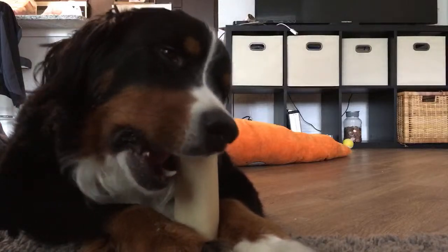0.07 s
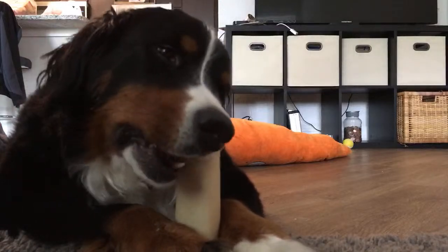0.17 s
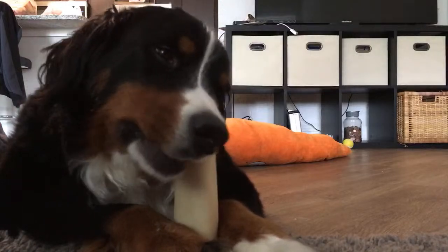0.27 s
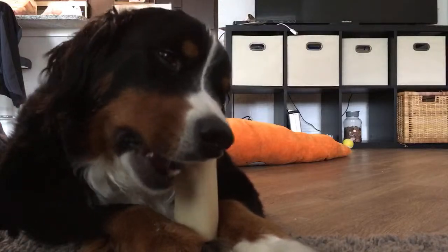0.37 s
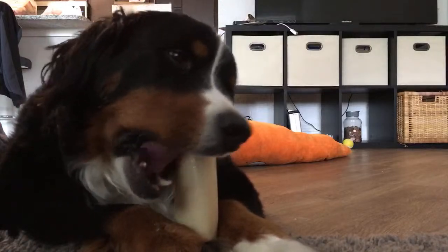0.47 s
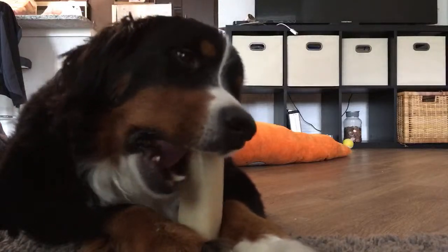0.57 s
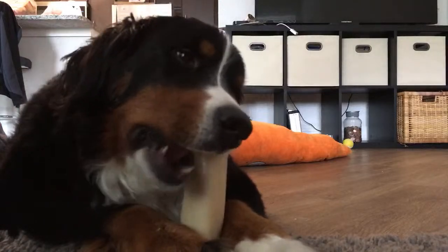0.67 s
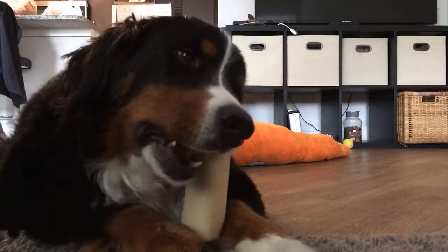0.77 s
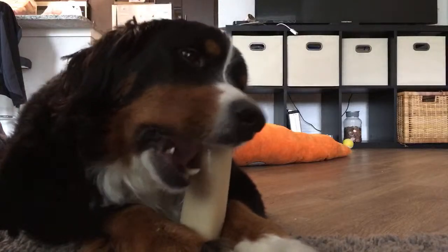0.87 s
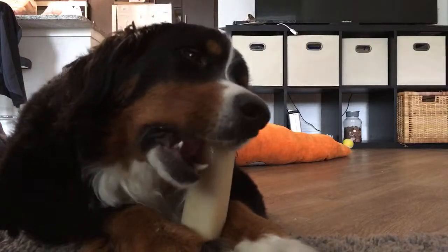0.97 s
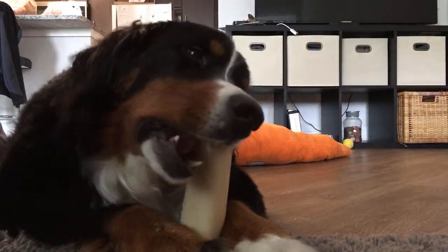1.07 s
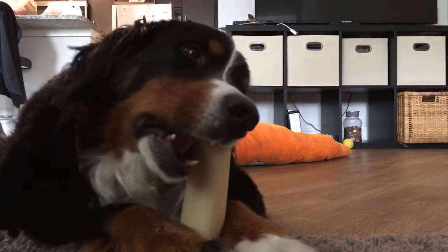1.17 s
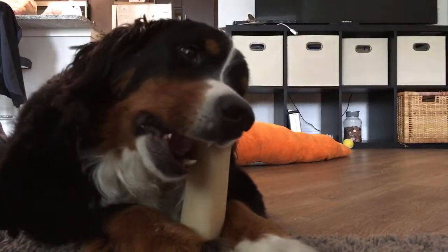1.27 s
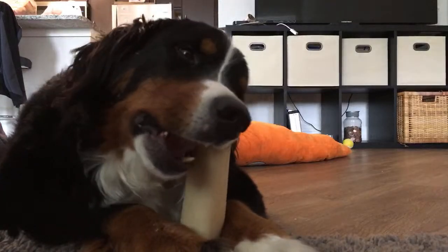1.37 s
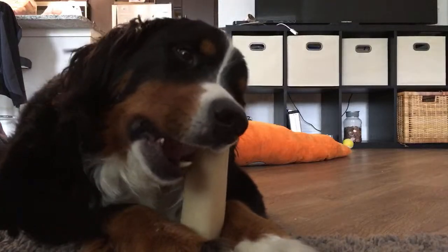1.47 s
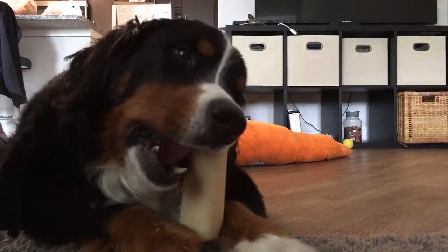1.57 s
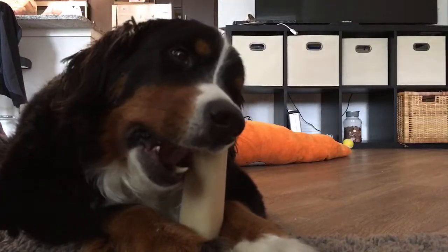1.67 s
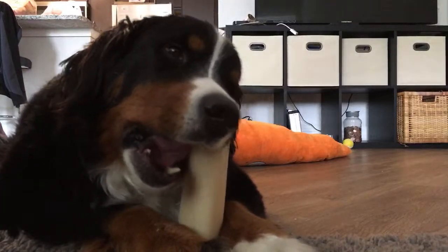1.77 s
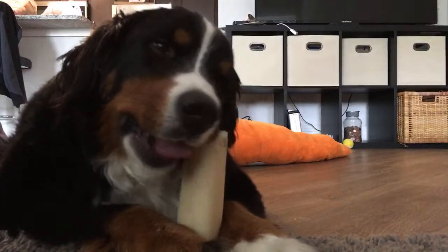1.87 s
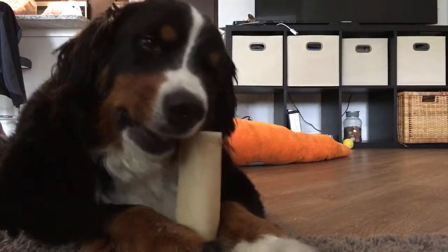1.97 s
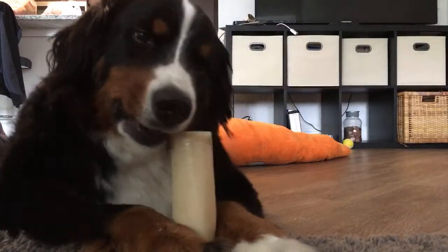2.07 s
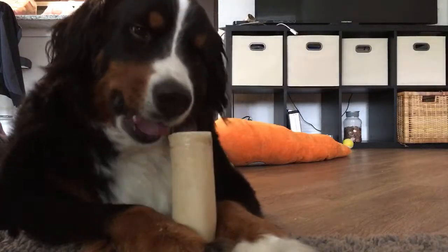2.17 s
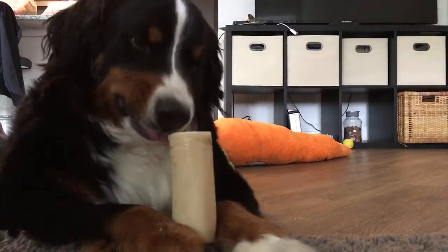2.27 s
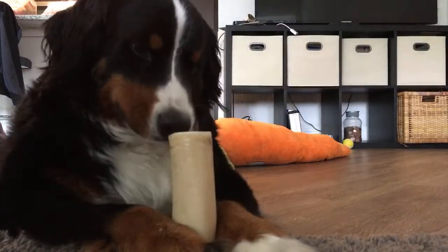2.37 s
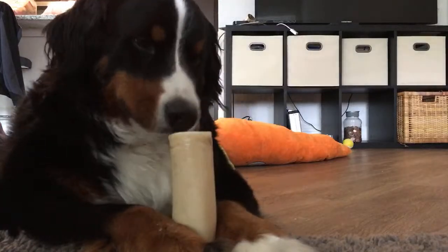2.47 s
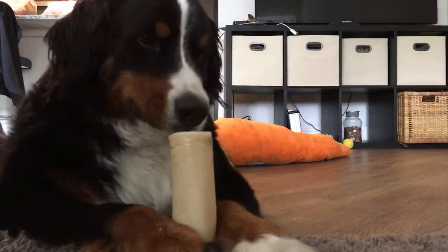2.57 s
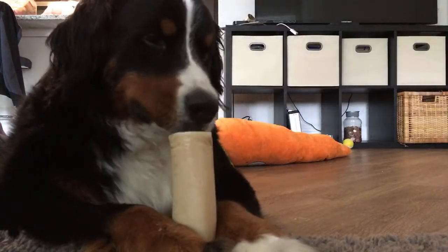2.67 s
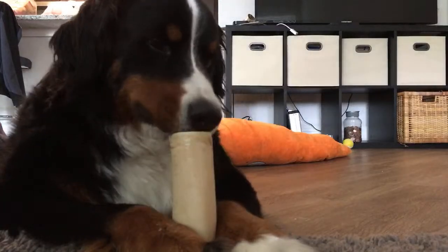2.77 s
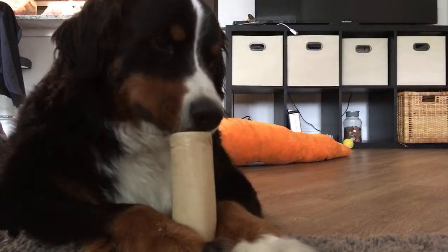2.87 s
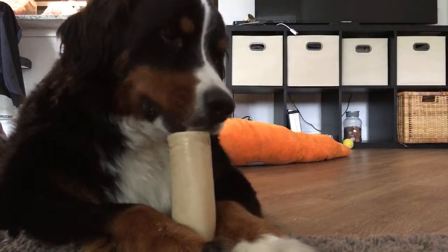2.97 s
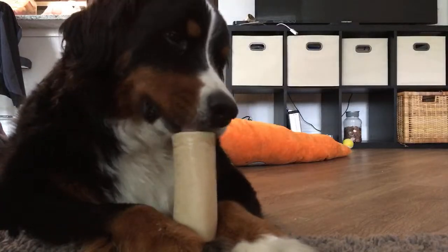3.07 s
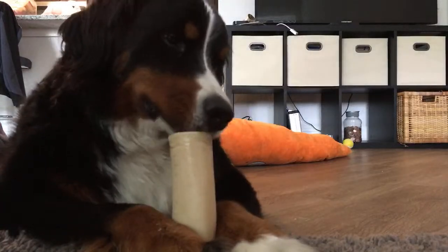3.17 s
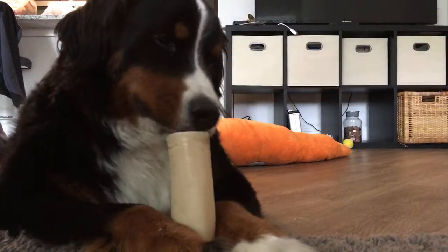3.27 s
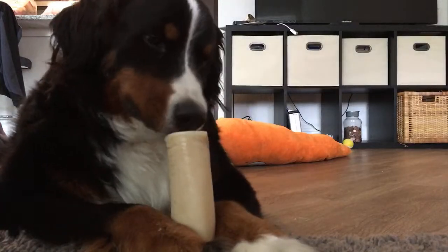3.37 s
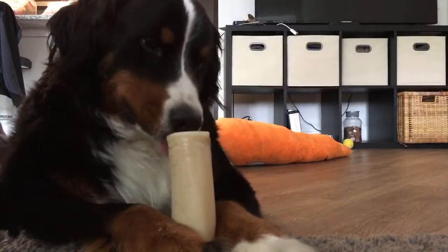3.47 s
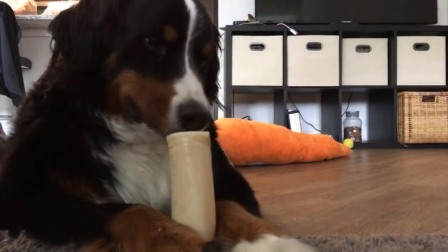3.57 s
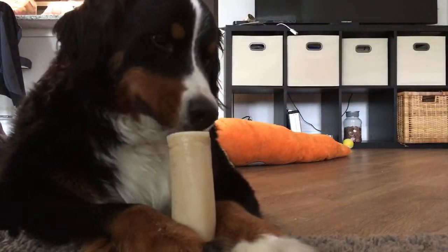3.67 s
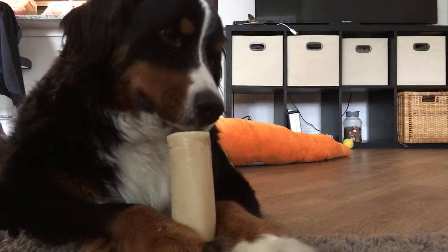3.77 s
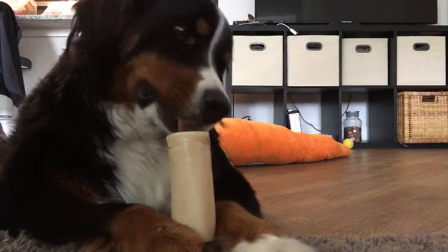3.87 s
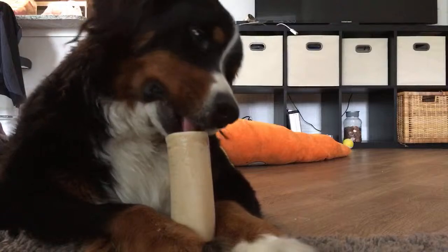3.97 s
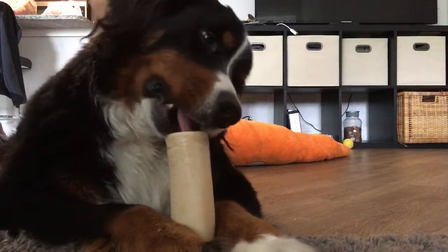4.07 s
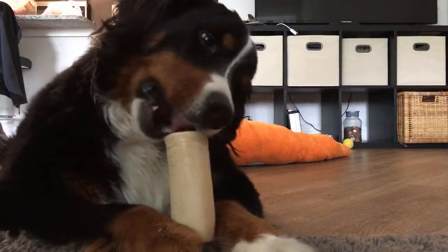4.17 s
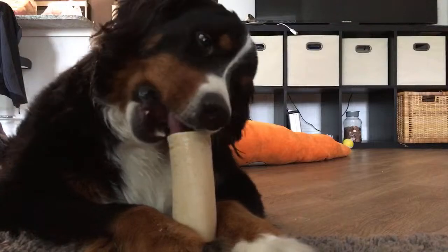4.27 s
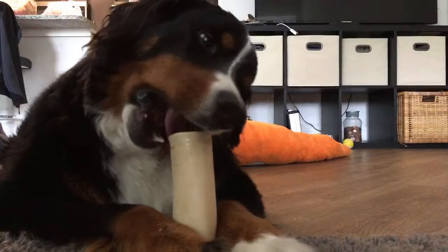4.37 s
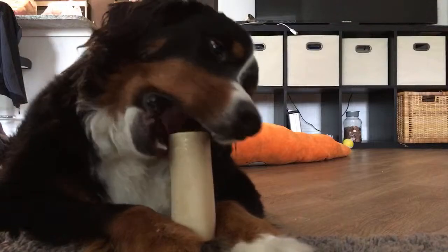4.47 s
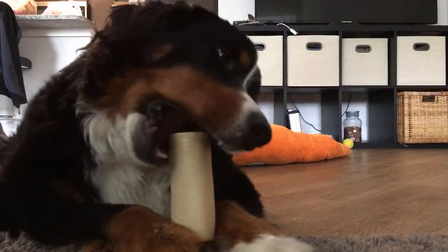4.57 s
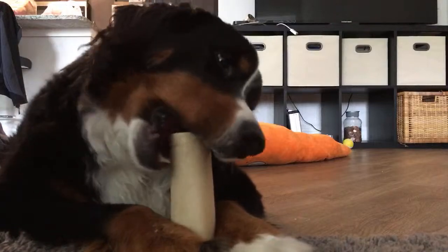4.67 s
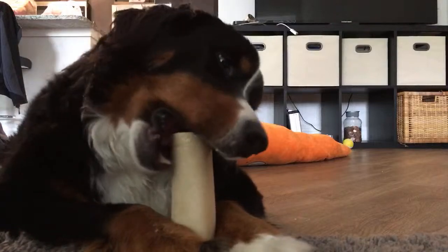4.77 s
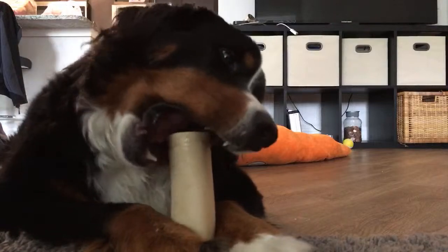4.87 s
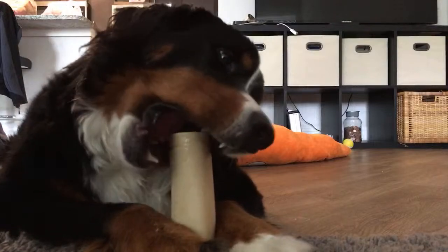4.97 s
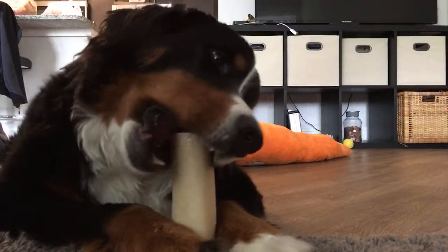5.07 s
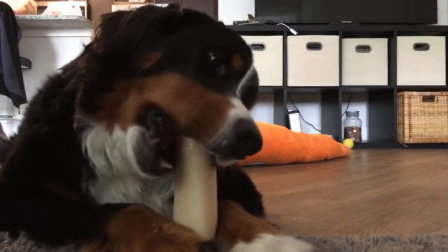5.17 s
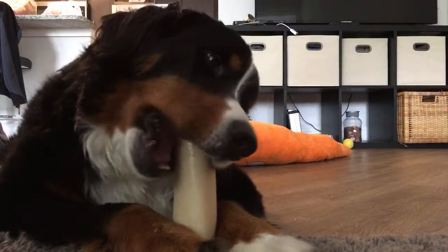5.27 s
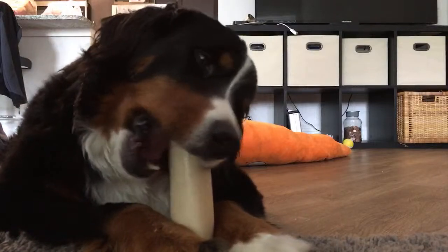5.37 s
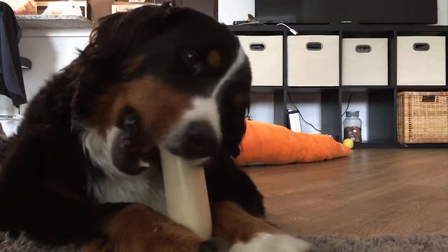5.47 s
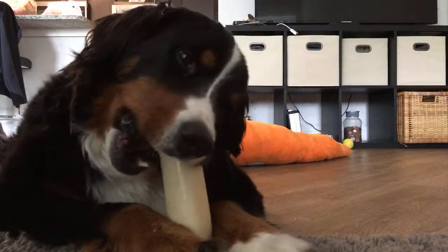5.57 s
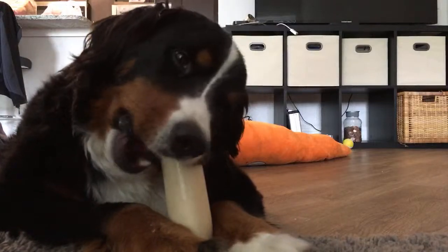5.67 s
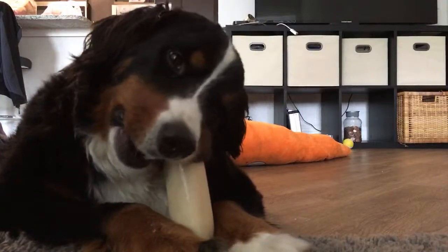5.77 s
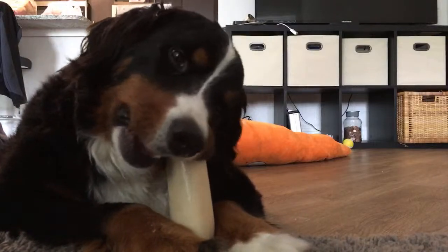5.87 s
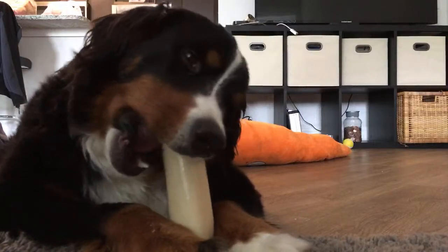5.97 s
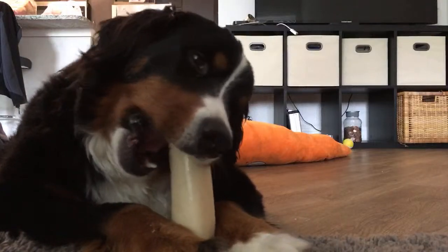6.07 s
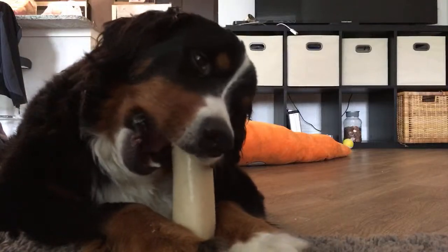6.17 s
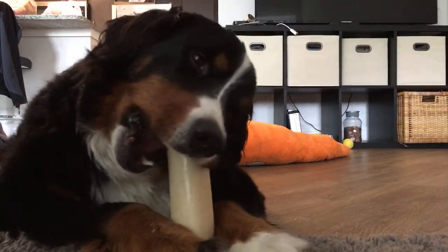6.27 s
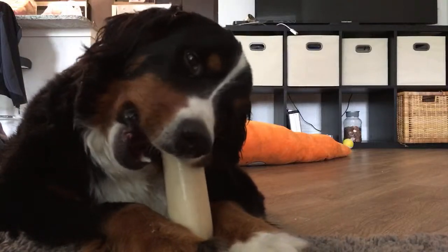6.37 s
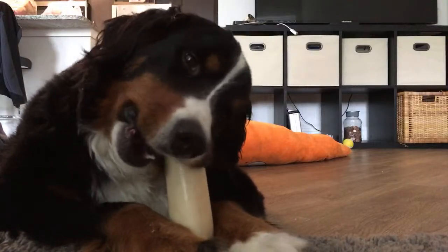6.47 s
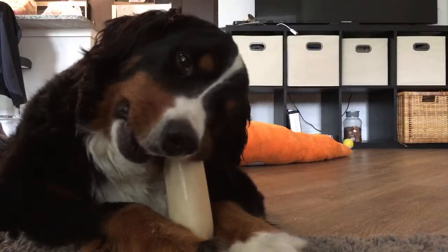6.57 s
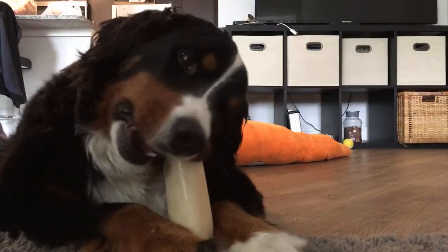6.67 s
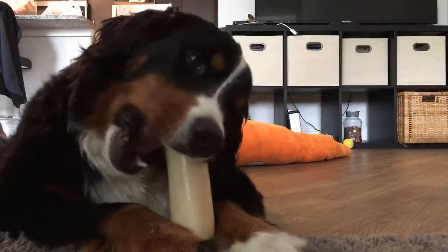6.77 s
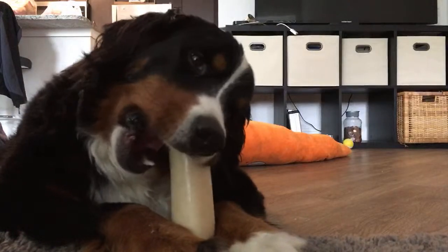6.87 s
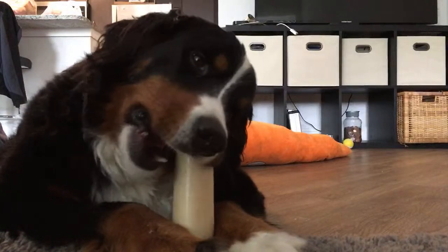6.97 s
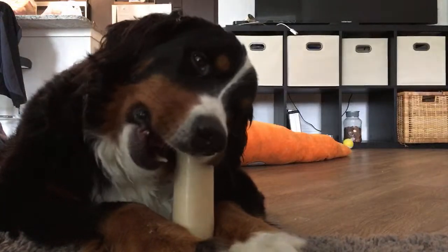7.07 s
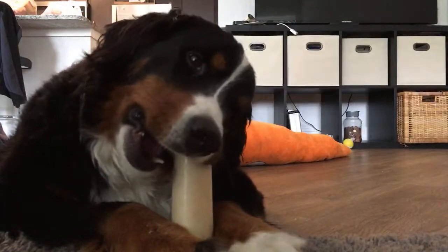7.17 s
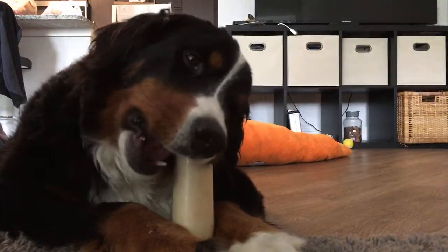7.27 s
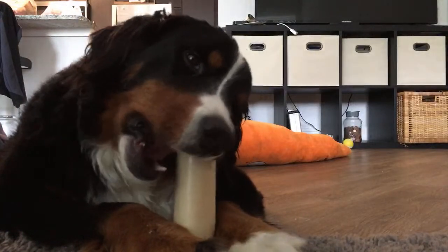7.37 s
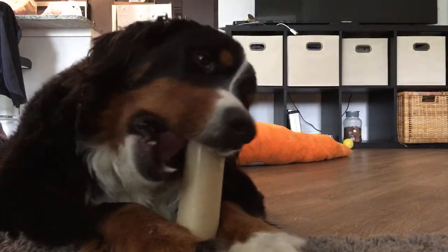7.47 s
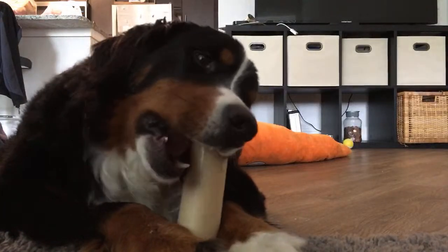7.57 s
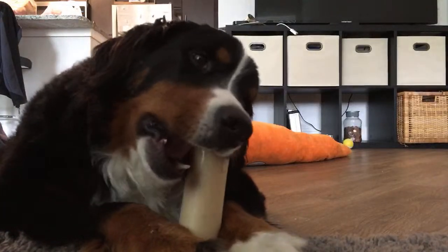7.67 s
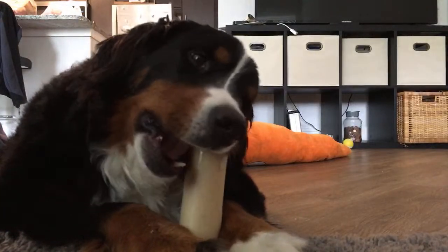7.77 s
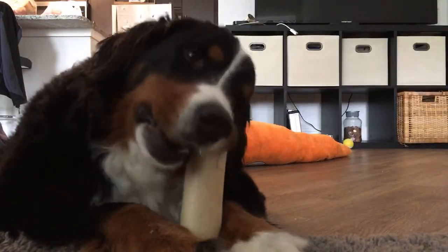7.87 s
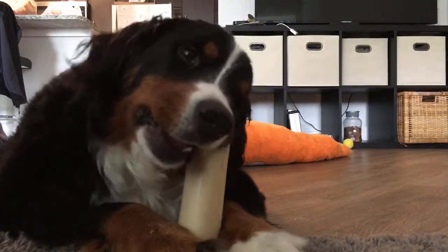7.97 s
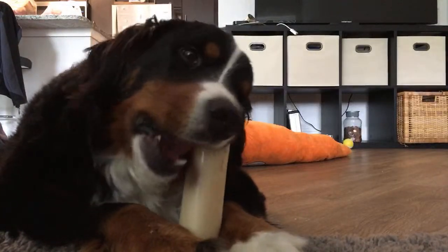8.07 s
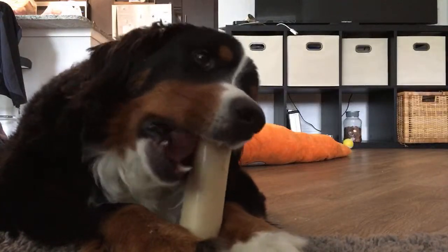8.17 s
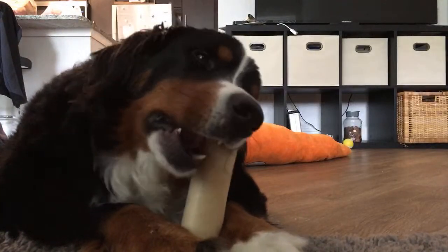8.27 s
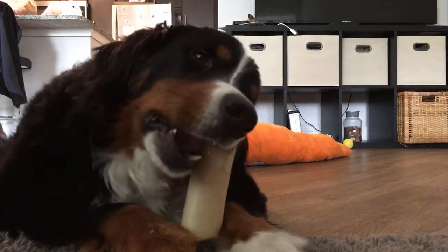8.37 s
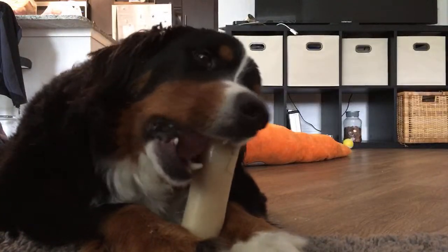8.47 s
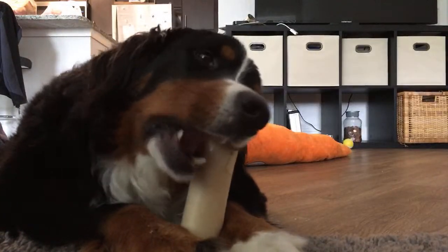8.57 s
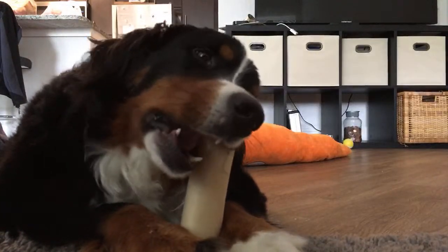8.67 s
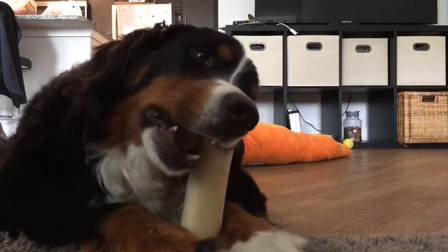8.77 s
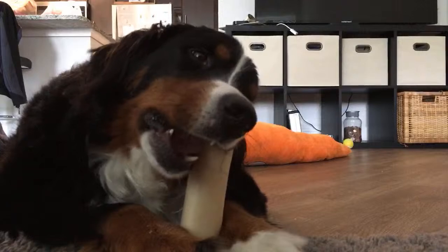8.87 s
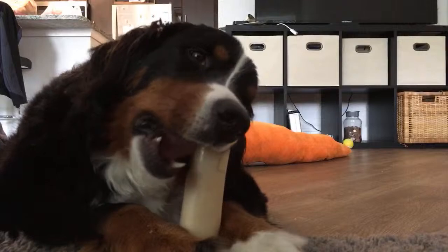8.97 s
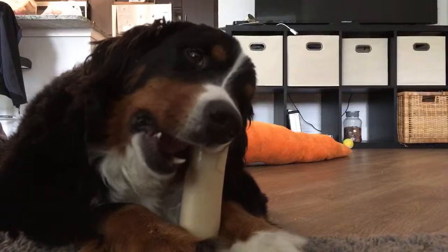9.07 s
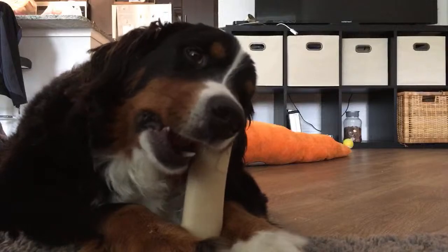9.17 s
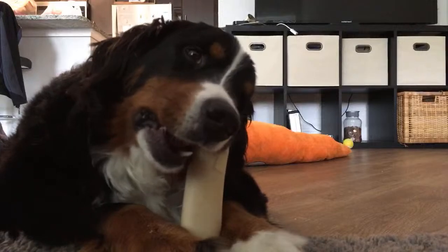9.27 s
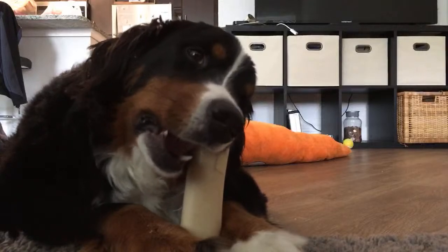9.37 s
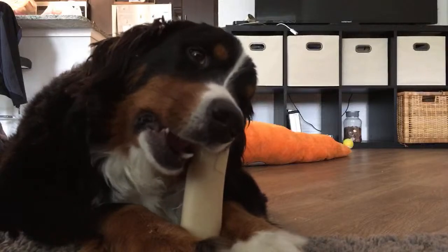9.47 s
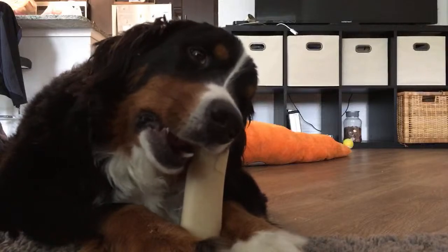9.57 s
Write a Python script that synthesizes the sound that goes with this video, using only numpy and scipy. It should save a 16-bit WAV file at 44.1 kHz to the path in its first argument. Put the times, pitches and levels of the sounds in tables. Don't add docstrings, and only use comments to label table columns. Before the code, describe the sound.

Close on a large dog chewing a hard bone on the floor of a living room. Irregular small ticks, chips and muffled tooth presses, then a violent crack near one and a half seconds that rings around the room. Wet tongue smacks follow in a quieter stretch, gnawing resumes, and a second thudding crack comes near eight seconds. A low hum and thin, fast-ticking phone hiss run underneath.

```python
import sys
import numpy as np
from scipy import signal
from scipy.fft import rfft, irfft
from scipy.io import wavfile

SR = 44100
rng = np.random.default_rng(int(sys.argv[2]) if len(sys.argv) > 2 else 0)


def int16_out(signal):
    q = np.round(np.clip(np.atleast_2d(signal).T, -1, 1) * 32767)
    wavfile.write(sys.argv[1], SR, q.astype(np.int16))


def makeup_ratio(level_db):
    decades = np.asarray(level_db, float) / 20
    return 10 ** decades


N = 424683

# pitch_hz, level_db (rms)
HUM_LINES = [(120.1, -54.5), (166.0, -42.5), (797.0, -77.5)]
# freq_hz, density_db
RUMBLE_SPECTRUM = [(15, -45), (25, -34), (38, -77.5), (64, -18), (145, -5), (167, -3.5), (189, -6),
                   (216, -5.5), (479, -30), (600, -34), (780, -76.5), (1320, -120)]
RUMBLE_SPAN_DB = 10
# start_s, rumble_db
LEANING = [
    (0.0, -55),
    (0.7, -56),
    (1.37, -54.5),
    (1.85, -57.5),
    (5.0, -58),
    (7.1, -56),
    (8.77, -55),
    (9.63, -57),
]
# freq_hz, density_db
AIR_SPECTRUM = [(240, -11), (400, -5), (526, -13.5), (783, -11.5), (943, -15.5), (1120, -14), (6080, -32),
                (7800, -35), (10100, -70.5), (17200, -120)]
AIR_DB = -63
# freq_hz, density_db
HISS_SPECTRUM = [(4470, -20.5), (7600, -38), (7950, -15.5), (8260, 0.5), (9140, 1), (9940, -0.5),
                 (11200, 3.5), (13500, -6.5), (15500, -2)]
HISS_DB = -66.5
# start_s, lag_ms, jitter_ms, stragglers_db
TICK_LAG = [(0, 29, 2, -5), (.43, 22, 3, -5), (.65, 11, 4, -4), (1.12, 5, 5, -4), (1.55, 24.5, 4, -6),
            (3.33, 21.5, 1, -6), (3.75, 10, 1, -5), (4.1, 14, 3, -3), (5.0, 12.5, 4, -3), (6.72, 5, 5, -1),
            (9.02, .5, 1, -2), (9.25, -3.8, 2, -2)]
TICKS_PER_S = 30
# level_db, centre_hz, width_octaves, t60_s
EARLIER_CRACK = (-54.5, 1348, 3, 0.7)

# start_s, level_db, bone_hz, jaw_load_db
CHIPS = [(.232, -44.5, 3500, -8), (.4205, -48, 3560, -12), (.4367, -39, 3850, -7), (.6629, -57, 3940, -2.5),
         (.822, -62.5, 4500, 2), (1.152, -51, 2740, -21), (1.3187, -58, 2920, -4.5),
         (3.0674, -64, 5115, -8.5), (4.673, -54.5, 2930, -15.5), (5.024, -63, 2895, -3),
         (5.8054, -50, 4730, -9), (6.102, -48, 3600, -10.5), (6.575, -52, 3780, -11),
         (6.8772, -66, 2713, 8), (7.044, -49, 4020, -13.5), (8.0172, -42, 2270, 0),
         (9.5306, -57, 3470, -10)]
# start_s, level_db, snap_hz, jaw_load_db
SMACKS = [(.4265, -57, 10300, -17), (1.6993, -46, 10980, -20), (3.1058, -47.5, 8900, -28),
          (3.1557, -46.5, 9300, -31.5), (3.175, -50, 9300, -30), (3.1926, -45.5, 12100, -33),
          (4.365, -50.5, 9500, -13), (5.4644, -58, 10220, -15), (5.5154, -46.5, 11990, -21),
          (5.8134, -35, 8550, -25), (8.1519, -52.5, 11150, -8), (8.245, -58, 8500, -24),
          (3.69, -55, 9400, -26)]
# start_s, level_db, bone_hz, jaw_load_db
TAPS = [(.4484, -44.5, 4200, -8), (.4638, -50, 3620, -6), (.8594, -55.5, 4700, -2), (1.1328, -52, 3020, -7),
        (1.2336, -70.5, 2810, 17.5), (1.3593, -60, 2970, -2), (1.3694, -52, 4360, -3.5),
        (2.33, -54, 3360, -10), (3.4717, -51.5, 3730, -17.5), (4.7077, -51.5, 4680, -21),
        (4.778, -68, 2790, 6), (4.8998, -53.5, 3600, -12), (5.846, -57, 4120, -2), (6.9105, -70, 2770, 8.5),
        (7.6789, -39.5, 3650, -12), (7.8068, -49, 5150, -7), (7.9992, -32.5, 3764, -15),
        (8.266, -46, 2620, -6.5), (8.3394, -50.5, 3700, -8.5), (8.8435, -33.5, 3600, -18),
        (9.2584, -47, 3400, -7.5)]
# start_s, level_db, bone_hz, jaw_load_db
GRINDS = [(2.845, -61.5, 4390, -9.5), (3.68, -61, 5650, -13), (3.6982, -50, 5750, -20.5),
          (4.8145, -48, 3100, -13.5), (5.1165, -55.5, 2200, -1.5), (5.2362, -56.5, 4530, 0),
          (5.6082, -53, 3750, -8), (6.129, -50, 3170, 2.5), (6.8942, -50, 3220, 4.5),
          (6.9642, -47, 4070, -3.5), (7.1056, -46, 3600, -10), (8.3135, -61, 5010, -13),
          (5.0383, -52, 3320, -20)]
# start_s, level_db, bone_hz, jaw_load_db
PRESSES = [(2.8545, -49, 3220, -26), (3.0405, -51.5, 3127, -21), (3.614, -58, 3500, -15.5),
           (5.128, -63, 2100, 3), (5.8215, -47, 3830, -13), (6.082, -56, 3800, -8), (6.148, -65.5, 2500, 3),
           (6.1958, -54, 3940, -14), (7.6218, -48.5, 3580, 1), (8.525, -56.5, 3500, -0.5),
           (8.6066, -56.5, 1900, 5), (8.787, -58, 3450, -9.5), (8.837, -50.5, 3520, -5),
           (9.124, -66, 2490, 6), (9.289, -64.5, 1100, 5), (9.511, -58.5, 1600, 2.5)]
# bone_db, edge_db, snap_db
TAP_MIX = (-1, -18, -17)
GRIND_MIX = (0.1, -2, -13)
CHIP_MIX = (-1.8, -14, 0.1)
SMACK_MIX = (-16, -30, 0.1)
PRESS_MIX = (0.1, -40, -40)
SNAP_HZ, SMACK_BONE_HZ = 10100, 3470

# start_s, level_db, mode_hz, t60_s
THUDS = [(1.4853, -18, 209, 0.027), (1.503, -33.5, 89.2, 0.2), (7.9478, -9.5, 205, 0.03),
         (7.953, -23.5, 103, 0.1), (7.965, -23.5, 190, 0.17), (7.989, -31.5, 270.6, 0.21),
         (7.952, -34.5, 337, 0.12), (7.959, -26, 142, .12), (8.843, -27, 227, 0.022),
         (5.82, -34.5, 332, 0.061), (6.13, -34.5, 315, 0.0089), (5.235, -39.5, 393, 0.028),
         (5.609, -37.5, 348, 0.02), (6.894, -39.5, 372, 0.029), (8.272, -35.5, 296, 0.029),
         (0.269, -45, 86, 0.054), (1.158, -44, 90.5, 0.11), (1.261, -46, 80.75, 0.091),
         (5.871, -54, 85, 0.15), (6.929, -51, 85, 0.034), (9.29, -47.5, 80.5, .1)]
# start_s, length_s, level_db, centre_hz, width_octaves
SLIDES = [(0.43, 0.04, -58, 3000, 1.9), (0.819, 0.053, -69, 4000, 1), (1.462, 0.053, -56.5, 5770, 1.9),
          (6.852, .02, -68.5, 3500, 0.53), (7.795, 0.018, -66.5, 3510, 1.2),
          (7.937, 0.0086, -48, 4700, 1.6), (2.02, 0.032, -60.5, 9130, 0.45), (3.191, 0.11, -61, 9790, 0.63),
          (3.167, 0.096, -71, 3780, 1.6), (3.677, 0.043, -68.5, 5400, 0.56),
          (5.52, 0.064, -70, 13000, 0.47), (5.804, 0.042, -59, 5960, 2.2), (6.082, 0.09, -69, 3990, 1.7),
          (6.897, 0.032, -71.5, 1210, 2.5), (7.609, 0.058, -77.5, 1510, 1.04),
          (8.019, 0.03, -66, 2520, 2.7), (8.662, 0.05, -67.5, 5500, 1.5), (8.836, 0.022, -47, 980, 0.63),
          (9.093, 0.094, -66, 9430, 0.42), (9.106, .1, -67, 14000, 0.27), (9.1, 0.036, -70.5, 4490, 1.5),
          (9.246, 0.039, -60.5, 6020, 2.5), (9.512, 0.12, -66, 9300, 0.37), (9.515, .1, -68, 14000, .25)]
LONG_LICK_S = .095

# start_s, level_db, crumble_s, tilt_db_per_octave, snap_over_ring_db
CRACKS = [(1.481, -27, 0.0037, -18, -2.5), (1.4828, -19.5, .003, -5, -9.5), (1.4836, 5.5, 0.0014, 6, -13.5),
          (1.4853, -8.5, 0.0029, 1, -7.5), (1.487, -17.5, 0.0046, 16, -6.5),
          (7.9435, -13.5, 0.0025, -14, 6.5), (7.9450, -16.5, 0.0026, -19, 4.5),
          (7.9488, -13.5, 0.00272, -12, 1.5), (7.9575, -22, 0.0041, -29, -4), (7.961, -35, 0.0025, -17, -2),
          (7.976, -31.5, 0.0027, 0, -1)]
# mode_hz, level_db, t60_s
BONE_MODES = [(970, -13.5, 0.015), (1330.6, -16, .01), (2480, -4, 0.01), (3730, -3, 0.0072),
              (4200, -4, 0.0055), (5700, -8, 0.004), (6650, -7, 0.0065), (8830, 3, 0.0031),
              (9300, -1, 0.0056), (11506, -5.5, 0.0014), (13600, -13, 0.0014)]
# start_s, level_db, tilt_db_per_octave, shaft_rings_db
THROWN = [
    (1.4840, -1, 0.8, -6),
    (7.9450, -11.5, -3.5, -8.5),
    (7.9570, -17.5, -1, -16),
]
# freq_hz, level_db
THROWN_COLOUR = [(400, -9.5), (1300, -2.5), (1800, -10), (4300, -5), (7600, -7), (9000, 1.5), (12000, -3),
                 (15500, -16)]
# ring_hz, level_db, t60_s
SHAFT_RINGS = [(1290, -26, .018), (2410, -20, 0.026), (3600, -27, .014), (4300, -23, .016),
               (4870, -27, .014), (5400, -25, .014), (6610, -24, .012), (8900, -18, 0.006),
               (9540, -22, .01)]
# centre_hz, t60_s, level_db
ROOM = [(250, 0.69, -25), (700, 0.47, -23.5), (2070, 0.65, -22), (4902, 0.7, -28), (9300, 0.47, -19),
        (14000, .3, -26.5)]
FIRST_WALL_S = .013
# start_s, spread_s, over_tail_db
NEAR_WALLS = [
    (0.0126, 0.0041, 6),
    (0.021, .003, 7.5),
    (.041, .004, 2.5),
]

PORT_DIP_HZ, PORT_DIP_OCTAVES, PORT_DIP = 7400, 0.22, 0.38
GAP_S, GAP_LENGTH_S, GAP_EDGE_S = 1.33563, .005, .0006
DROPOUT_S, DROPOUT_LENGTH_S, HELD_S = 6.314, .042, .0064


def rms_one(x):
    return x / np.sqrt(np.mean(x ** 2) + 1e-20)


def peak_one(x):
    return x / np.max(np.abs(x))


def log_interp(hz, points):
    table = np.array(points)
    return np.interp(np.log(hz), np.log(table[:, 0]), table[:, 1])


def coloured(points):
    hz = np.arange(1, N // 2 + 2) * SR / N
    spectrum = rfft(rng.standard_normal(N))
    return rms_one(irfft(spectrum * makeup_ratio(log_interp(hz, points)), N))


def drift(rate_hz):
    steps = rng.standard_normal(1000)
    return np.interp(np.arange(N) / SR * rate_hz, np.arange(1000), steps)


def band(x, hz, octaves):
    edges = np.clip(hz * 2 ** (np.array([-.5, .5]) * octaves), 20, .45 * SR)
    return signal.sosfilt(signal.butter(2, edges, "band", fs=SR, output="sos"), x)


def ring(clicks, hz, t60):
    r = makeup_ratio(-60 / (t60 * SR))
    w = 2 * np.pi * hz / SR
    return signal.lfilter([0, np.sin(w)], [1, -2 * r * np.cos(w), r * r], clicks + 1e-18)


def add(out, s, sound):
    at = round(s * SR)
    out[at:at + len(sound)] += sound[:N - at]


def crumble(length_s, rise_s=.0005, slip=16.0):
    t = np.arange(2000) / SR
    grit = rng.standard_normal(2000) ** 3
    grit[int(rise_s * SR)] = slip * np.sign(grit[0])
    return grit * np.clip(t / rise_s, 0, 1) ** 2 * np.exp(-t / length_s)


def appliance():
    t = np.arange(N) / SR
    lines = np.zeros(N)
    for hz, db in HUM_LINES:
        level = makeup_ratio(db + 3 + 1.2 * drift(6))
        lines += level * np.sin(2 * np.pi * hz * t + .3 * drift(2))
    lean_db = np.interp(t, *np.transpose(LEANING))
    rumble = makeup_ratio(lean_db + RUMBLE_SPAN_DB + 1.6 * drift(14)) * coloured(RUMBLE_SPECTRUM)
    air = makeup_ratio(AIR_DB + 0.12 * drift(2.2)) * coloured(AIR_SPECTRUM)
    return lines + rumble + air


def phone_hiss(tick_db=14.5, sag_db=-3):
    start = np.arange(-1, int(N / SR * TICKS_PER_S)) / TICKS_PER_S
    since, *clock = np.transpose(TICK_LAG)
    row = np.maximum(np.searchsorted(since, start) - 1, 0)
    lag_ms, jitter_ms, late_db = np.array(clock)[:, row]
    chance = rng.random((len(start), 8))
    first = start + (lag_ms + jitter_ms * (chance[:, 3] - .5)) / 1000
    later = np.cumsum(.006 + .003 * chance[:, :3], axis=1)
    times = np.column_stack([first, first[:, None] + later])
    sizes_db = np.array([1, 0, -4, -7]) + late_db[:, None] * [0, 1, 1, 1]
    sizes = makeup_ratio(sizes_db + np.array([4, 8, 10, 10]) * (chance[:, 4:] - .5))
    at = np.clip((times.ravel() * SR).astype(int), 0, N - 1)
    marks = np.bincount(at, sizes.ravel(), N) * rng.choice([-1, 1], N)
    ticks = 9 * band(band(marks, 10900, .42), 10900, .42)
    t = np.arange(N) / SR
    age_s = t - first[np.maximum(np.searchsorted(first, t) - 1, 0)]
    bed = makeup_ratio(sag_db * np.clip(age_s * TICKS_PER_S, 0, 1.5)) * coloured(HISS_SPECTRUM)
    return makeup_ratio(HISS_DB) * (bed + makeup_ratio(tick_db) * ticks)


def earlier_crack():
    db, hz, octaves, t60 = EARLIER_CRACK
    diffuse = band(rng.standard_normal(N), hz, octaves)
    shaft = 0.12 * ring(rng.standard_normal(N), SHAFT_RINGS[0][0], 0.013)
    return makeup_ratio(db - 60 * np.arange(N) / SR / t60) * rms_one(diffuse + shaft)


def contact(s, db, load_db, mix_db, bone_hz, snap_hz):
    bone, edge, snap = makeup_ratio(db + np.array(mix_db))
    knock = makeup_ratio(db + load_db)
    grit = crumble(0.0017, slip=23.0)
    bone_ring = 1.015 * peak_one(ring(grit, bone_hz, 0.0068)) + 0.71 * peak_one(band(grit, 3900, 1.1))
    bright = band(band(grit, snap_hz, 0.5), 11000, 0.9) + 0.08 * ring(grit, 8700, 0.0045)
    high_knock = band(crumble(.0005, slip=30.0), 1250, 1.4)
    low_knock = band(crumble(0.004, slip=25.0), 560, 1.5)
    sound = np.zeros(2100)
    add(sound, 0, bone * peak_one(bone_ring))
    add(sound, 0, edge * makeup_ratio(7) * peak_one(band(grit, 5200, 1.4)))
    add(sound, 0, snap * makeup_ratio(6) * peak_one(bright))
    add(sound, .0004, knock * makeup_ratio(8.0) * peak_one(high_knock))
    add(sound, .0015, knock * makeup_ratio(8.5) * peak_one(low_knock))
    return sound


def bites():
    out = np.zeros(N)
    kinds = ((TAPS, TAP_MIX), (GRINDS, GRIND_MIX), (CHIPS, CHIP_MIX), (PRESSES, PRESS_MIX))
    for rows, mix_db in kinds:
        for s, db, hz, load_db in rows:
            add(out, s, contact(s, db, load_db, mix_db, hz, SNAP_HZ))
    for s, db, hz, load_db in SMACKS:
        add(out, s, contact(s, db, load_db, SMACK_MIX, SMACK_BONE_HZ, hz))
    return out


def thuds():
    out, push = np.zeros(N), np.zeros(12000)
    push[:60] = -np.hanning(60)
    for s, db, hz, t60 in THUDS:
        add(out, s, makeup_ratio(db) * peak_one(band(ring(push, hz, t60), hz, 1.4)))
    return out


def slides():
    out = np.zeros(N)
    t = np.arange(8000) / SR
    for s, length_s, db, hz, octaves in SLIDES:
        grains = rng.standard_normal(8000) * makeup_ratio(5 * np.minimum(rng.exponential(1, 8000), 3.5))
        swell = 0.9 if length_s > LONG_LICK_S else 0.4
        stroke = np.sin(np.pi * np.clip(t / length_s, 0, 1) ** swell)
        wet = band(band(grains, hz, octaves), hz, 1.3 * octaves)
        add(out, s, makeup_ratio(db) * stroke * rms_one(wet))
    return out


def room(x):
    t = np.arange(SR // 2) / SR
    scatter = makeup_ratio(5 * np.minimum(rng.exponential(1, len(t)), 4))
    tail = np.zeros(len(t))
    for hz, t60, db in ROOM:
        diffuse = band(rng.standard_normal(len(t)) * scatter, hz, 1.6)
        tail += makeup_ratio(db - 60 * t / t60) * rms_one(diffuse)
    walls_db = sum(db * np.exp(-((t - s - spread) / spread) ** 2 * 2) for s, spread, db in NEAR_WALLS)
    onset = np.clip((t - FIRST_WALL_S) / 0.0034, 0, 1)
    return signal.fftconvolve(x, tail * makeup_ratio(walls_db) * onset / 20)[:N]


def cracks():
    out = np.zeros(N)
    for s, db, length_s, tilt_db, broad_db in CRACKS:
        grit = crumble(length_s)
        uneven_db = rng.normal(0, 2.5, len(BONE_MODES))
        modes = np.zeros(len(grit))
        for (hz, mode_db, t60), extra_db in zip(BONE_MODES, uneven_db):
            bright_db = tilt_db * np.log2(max(hz / 4000, 1))
            modes += makeup_ratio(mode_db + bright_db + extra_db) * ring(grit, hz, t60)
        snap = makeup_ratio(broad_db) * peak_one(band(grit, 4100, 2.5))
        add(out, s, makeup_ratio(db) * peak_one(peak_one(modes) + snap))
    return out


def thrown():
    out = np.zeros(N)
    hz = np.arange(1, 2050) * SR / 4096
    click = np.eye(1, 4096, 512)[0]
    rings = sum(makeup_ratio(db) * ring(click, ring_hz, t60) for ring_hz, db, t60 in SHAFT_RINGS)
    for s, db, tilt_db, rings_db in THROWN:
        colour_db = log_interp(hz, THROWN_COLOUR) + tilt_db * np.log2(hz / 2000)
        pulse = irfft(rfft(click + makeup_ratio(rings_db) * rings) * makeup_ratio(colour_db))
        add(out, s - 512 / SR, makeup_ratio(db + 12) * pulse)
    return out


def scene():
    small = bites() + slides()
    to_walls = thrown() + makeup_ratio(-9.5) * small + makeup_ratio(-5.5) * band(small, 1000, 2.2)
    chewing = small + cracks() + room(to_walls)
    chewing = chewing - PORT_DIP * band(chewing, PORT_DIP_HZ, PORT_DIP_OCTAVES)
    return (chewing + thuds() + appliance() + phone_hiss() + earlier_crack())[None]


def gain_control(x, knee_db=-8, ratio=0.42, back_db_per_s=4.5, grab_s=0.012):
    creep_db = back_db_per_s * np.arange(N) / SR
    over_db = ratio * np.maximum(20 * np.log10(np.abs(x) + 1e-9) - knee_db, 0)
    cut_db = np.maximum(np.maximum.accumulate(over_db + creep_db) - creep_db, 0)
    r = np.exp(-1 / (grab_s * SR))
    return x * makeup_ratio(-signal.lfilter([1 - r], [1, -r], cut_db))


def dropout(x):
    at, held, n = round(DROPOUT_S * SR), round(HELD_S * SR), np.arange(N)
    phase = (n - at) % held
    blend = np.sin(np.pi / 2 * phase / held) ** 2
    loop = blend * x[at - held + phase] + (1 - blend) * x[at + phase]
    age_s = np.maximum(n - at, 0) / SR
    loop = makeup_ratio(-300 * age_s) * band(loop, 200, 7.3) - makeup_ratio(-400 * age_s) * band(loop, 7000, 3)
    fade_s = [0, .012, DROPOUT_LENGTH_S, DROPOUT_LENGTH_S + 0.01]
    lost = np.interp((n - at) / SR, fade_s, [0, .9, .9, 0])
    outside_gap_s = np.abs(n / SR - GAP_S - GAP_LENGTH_S / 2) - GAP_LENGTH_S / 2
    return (lost * loop + (1 - lost) * x) * np.clip(outside_gap_s / GAP_EDGE_S, 0, 1)


def band_limit(x):
    return signal.sosfilt(signal.butter(12, 15650, fs=SR, output="sos"), x)


def record(dry):
    heard = signal.sosfilt(signal.butter(2, 38, "high", fs=SR, output="sos"), dry[0])
    limited = np.clip(gain_control(heard), -.78, .78)
    top_cut = signal.butter(14, 15550, fs=SR, output="sos")
    mix = signal.sosfilt(top_cut, dropout(limited))
    return band_limit(mix[None])


dry = scene()
out = record(dry)
int16_out(out)
```